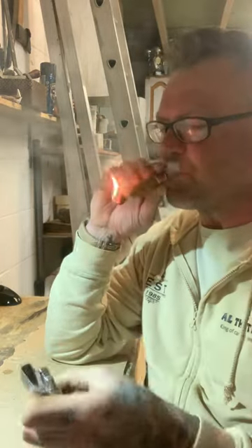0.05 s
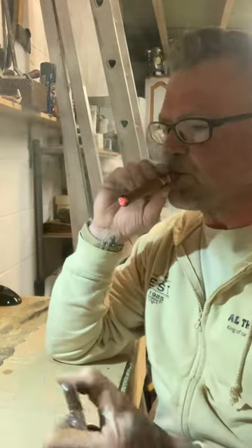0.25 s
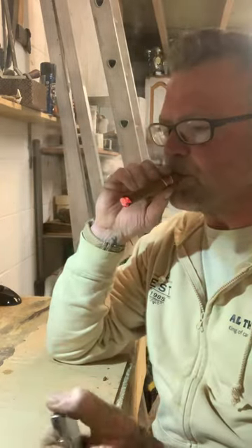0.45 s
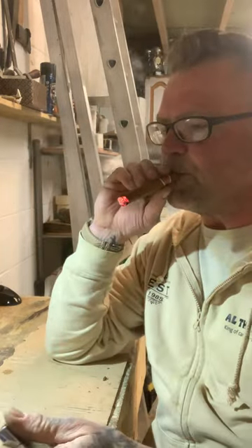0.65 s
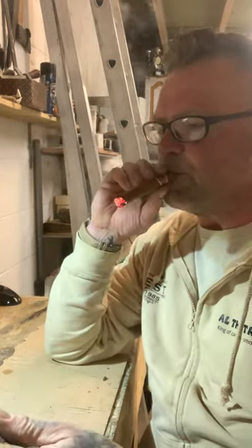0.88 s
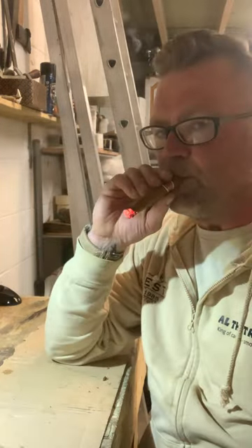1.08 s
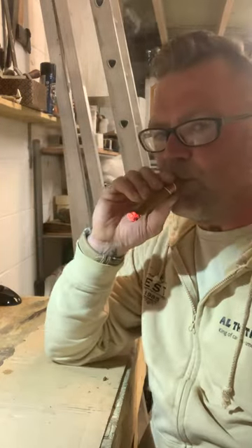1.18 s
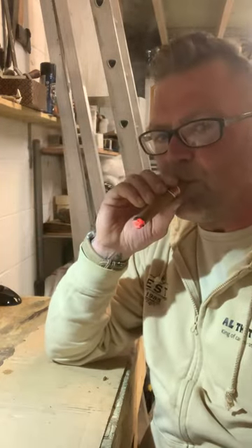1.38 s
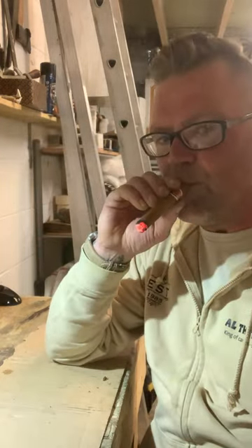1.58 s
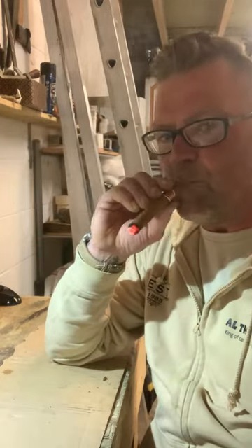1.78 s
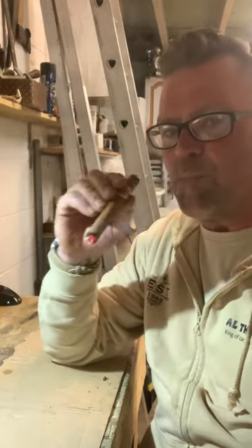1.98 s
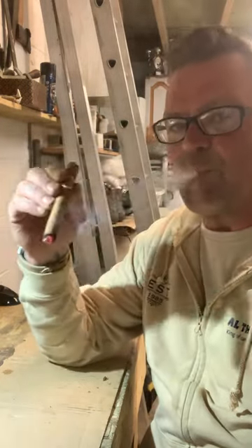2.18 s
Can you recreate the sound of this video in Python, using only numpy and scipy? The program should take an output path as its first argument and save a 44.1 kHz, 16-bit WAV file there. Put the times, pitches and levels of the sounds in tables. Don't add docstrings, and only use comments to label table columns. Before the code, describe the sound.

A metal lighter is flicked shut close to a phone microphone: brief scrape, cam snap, bright lid slam, short room echo; then a hand settles on the bench with small ticks, rubs and soft thumps.

```python
import sys
import numpy as np
from scipy import signal
from scipy.fft import rfft, irfft
from scipy.io import wavfile
from scipy.ndimage import uniform_filter1d

SR = 44100
rng = np.random.default_rng(int(sys.argv[2]) if len(sys.argv) > 2 else 0)


def digitize_waveform(pressure):
    field = np.atleast_2d(pressure).T
    bounded = np.clip(field, -1, 1)
    quanta = np.round(bounded * 32767).astype(np.int16)
    wavfile.write(sys.argv[1], SR, quanta)


def nominal_scale(level):
    x = np.asarray(level, float) / 20
    return 10 ** x


N = 99225
T = np.arange(N) / SR
HZ = np.fft.rfftfreq(N, 1 / SR) + 1


def along(table):
    hz, value = np.array(table).T
    return np.interp(np.log(HZ), np.log(hz), value)


def set_rms(x, db):
    return x * nominal_scale(db) / np.sqrt(np.mean(x ** 2))


def coloured_noise(table):
    return set_rms(irfft(rfft(rng.standard_normal(N)) * nominal_scale(along(table)), N), 0)


def wander(rate_hz):
    hold = int(SR / rate_hz)
    steps = np.repeat(rng.standard_normal(N // 100), hold)[:N]
    return 1.3 * uniform_filter1d(uniform_filter1d(steps, hold), hold)


def swell(middle_s, half_s):
    return np.exp(-((T - middle_s) / half_s) ** 2)


def trio(make):
    return np.array([make() for _ in range(3)])


def short(x):
    return x[:4096]


def place(start_s, shape):
    k = int(start_s * SR) + 1
    return np.pad(shape(short(T) + k / SR - start_s), (k, N))[:N]


def decaying_sine(t, hz, t60):
    return np.exp(-np.log(1000) * t / t60) * np.sin(2 * np.pi * hz * t)


# (frequency [Hz], level [dB per Hz])
AIR_SPECTRUM = [(25, -26.5), (60, -2), (180, -14), (400, -8.5), (600, -15), (2200, -29), (4400, -41.5),
                (6000, -63.5)]
# (frequency [Hz], level [dB per Hz])
HISS_SPECTRUM = [(3000, -14.5), (5000, -17), (6000, -0.5), (8400, 3), (10200, 2.5), (12500, -4.5),
                 (14400, -12), (14700, -49.5)]
# (frequency [Hz], level [dB], width [Hz])
HUM_RESONANCES = [(59, -64.5, 9.5), (134.6, -69, 14), (288.9, -68, 30), (339, -67, 30), (408, -66, 5.8),
                  (460, -65.5, 20), (532.3, -67.5, 26), (744, -70, 10), (881, -76, 17), (1265, -72, 80),
                  (1489, -75, 36), (2062, -80, 40), (2690, -85, 17), (3820, -85.5, 90)]
AIR_DB, HISS_DB = -55.5, -82


def air():
    hum_power = 0
    for hz, db, width in HUM_RESONANCES:
        hum_power = hum_power + nominal_scale(2 * db) / width / (1 + (2 * (HZ - hz) / width) ** 4)
    hum_gain = np.sqrt(hum_power * SR / 2)
    spectrum = rfft(trio(lambda: nominal_scale(AIR_DB) * coloured_noise(AIR_SPECTRUM)))
    spectrum = spectrum + rfft(trio(lambda: rng.standard_normal(N))) * hum_gain
    out = trio(lambda: nominal_scale(HISS_DB) * coloured_noise(HISS_SPECTRUM))
    half_octave = np.log2(HZ / 25) * 2
    for k in range(-1, 19):
        window = np.clip(1 - np.abs(half_octave - k), 0, 1)
        out = out + irfft(spectrum * window, N) * nominal_scale(1.6 * wander(9))
    return out


# (frequency [Hz], t60 [s])
ROOM_T60 = [(1000, 0.36), (2600, 0.41), (6000, 0.24), (10000, 0.21), (16000, .16)]
# (frequency [Hz], level [dB])
ROOM_COLOUR = [(2600, 2), (4300, 2), (5000, -6.5), (5600, 3), (8000, -2.5), (11000, -10), (14000, -2.5),
               (16000, -4.5)]
ROOM_DB = -12.5


def room(x):
    def tail():
        size = SR // 2
        hz, t, bins = signal.stft(rng.standard_normal(size), SR)
        t60 = np.interp(hz, *np.array(ROOM_T60).T)[:, None]
        echoes = signal.istft(bins * nominal_scale(-60 * t / t60), SR)[1][:size]
        echoes = echoes * np.clip(T[:size] / 0.01 - 1, 0, 1)
        wet = rfft(x) * rfft(echoes, N) * nominal_scale(ROOM_DB + along(ROOM_COLOUR))
        return irfft(wet, N) / np.sqrt(np.sum(echoes ** 2))
    return trio(tail)


# (middle [s], half length [s], level [dB])
THUMPS = [
    (0.19, 0.037, -50.5),
    (0.304, 0.043, -59.5),
    (0.836, 0.0525, -54.5),
    (0.997, 0.061, -58),
    (2.096, 0.14, -50.5),
]


def thumps():
    rumble = coloured_noise([(15, -25), (30, -6), (55, 0), (85, -5), (130, -30), (500, -90)])
    return rumble * sum(nominal_scale(db) * swell(middle, half) for middle, half, db in THUMPS)


# (middle [s], half length [s], level [dB], brightness [dB])
RUSTLES = [
    (0.088, 0.047, -62.5, -2),
    (0.203, 0.025, -55, -0.5),
    (0.744, 0.069, -65, -5),
    (0.85, 0.024, -56.5, -12),
    (0.922, 0.034, -58, -7.5),
    (1.027, 0.0418, -61, -15),
    (1.122, 0.035, -82, 3),
    (1.714, 0.0199, -75, 13.5),
    (2.12, 0.037, -65.5, 2),
    (2.16, 0.0582, -72, -2.5),
]
# (frequency [Hz], level [dB])
RUSTLE_SPECTRUM = [(500, -25.5), (1500, 0), (4000, -3), (5100, -13.5), (7000, -10), (8500, -11.5),
                   (10200, -7.5), (14000, -28)]


def rustle():
    out = 0
    for low_hz, high_hz, tilt in ((300, 5300, 0), (5000, 15000, 1)):
        band = signal.butter(2, (low_hz, high_hz), "band", fs=SR, output="sos")
        noise = signal.sosfiltfilt(band, trio(lambda: coloured_noise(RUSTLE_SPECTRUM)))
        grain = noise * nominal_scale(2.2 * wander(110))
        strokes = sum(nominal_scale(db + tilt * bright_db) * swell(middle, half) for middle, half, db, bright_db in RUSTLES)
        out = out + grain * strokes
    return out


# (time [s], level [dB], ring [Hz], ring t60 [s])
TICKS = [(0.045, -66, 6940, 0.074), (0.186, -40, 6413, 0.005), (0.186, -46, 4270, 0.0053),
         (0.186, -53, 10230, 0.0041), (0.187, -40, 14400, 0.0052), (0.187, -37.5, 2061, 0.016),
         (.422, -59.5, 14800, 0.0096), (.827, -51.5, 3930, 0.008), (0.8289, -41.5, 4000, 0.008),
         (.826, -46.5, 6920, 0.0069), (.831, -52, 10330, 0.0091), (0.8305, -43, 1904, 0.006),
         (0.829, -52, 13800, 0.006), (0.8409, -41.5, 4019, 0.012), (0.9084, -49.5, 10610, 0.0054),
         (0.9087, -52, 6820, .005), (1.026, -57, 7800, 0.021), (1.2275, -62, 11660, 0.016),
         (1.228, -57, 14820, 0.013), (2.0555, -55, 15370, 0.0097), (2.06, -54, 1480, 0.019)]
RUB_S, RUB_DB = 0.00075, -13.5
KNOCK_DB, KNOCK_TURNS = -11, 2.3


def ticks():
    def tick(t, hz, t60):
        rub = rng.standard_normal(len(t)) * t / RUB_S * np.exp(-t / RUB_S)
        body = nominal_scale(RUB_DB) * decaying_sine(t, hz, t60)
        knock = nominal_scale(KNOCK_DB) * np.exp(-t * hz / KNOCK_TURNS) * np.sin(2 * np.pi * hz * t)
        out = short(signal.fftconvolve(rub, body + knock))
        return out / np.abs(out).max()
    return sum(nominal_scale(db) * place(s, lambda t: tick(t, hz, t60)) for s, db, hz, t60 in TICKS)


RATTLE_RAD, RATTLE_S = 1.3, .01


def ring(start_s, modes):
    def shape(t):
        kicks = rng.standard_normal((len(modes), len(t)))
        jolt = signal.lfilter([1], [1, -1], kicks) * RATTLE_RAD / np.sqrt(RATTLE_S * SR)
        out = 0
        for (hz, db, t60), phase in zip(modes, jolt):
            decay = np.exp(-np.log(1000) * t / t60)
            out = out + nominal_scale(db) * decay * np.sin(2 * np.pi * hz * t + phase)
        return out
    return place(start_s, shape)


def crack(start_s, db, fall_s):
    return place(start_s, lambda t: nominal_scale(db) * rng.standard_normal(len(t)) * np.exp(-t / fall_s))


def blows(start_s, table, modes, ring_db, crack_db):
    out = 0
    for delay, blow_db, burst_db in table:
        db_per_khz = -1.6 if delay > 0 else 0
        struck = [(hz, db + db_per_khz * hz / 1000, t60) for hz, db, t60 in modes]
        out = out + nominal_scale(ring_db + blow_db) * ring(start_s + delay, struck)
        out = out + crack(start_s + delay, crack_db + burst_db, 0.0013)
    return out


# (frequency [Hz], level [dB], t60 [s])
CAM_MODES = [(1718, -6.5, 0.093), (1480, -16, 0.033), (2600, 4, 0.063), (2842, -9.5, 0.08),
             (2880, -14.5, 0.13), (3707, -4.5, 0.078), (3770, -6, 0.05), (4420, -7.5, 0.03),
             (2681, -21, 0.12), (5794, 1, 0.034), (6596, -13.5, .02), (7700, -9.5, 0.023),
             (10160, -6.5, 0.012), (9440, -15.5, 0.0078)]
# (time after the snap [s], ring [dB], crack [dB])
CAM_BLOWS = [
    (0, -1.5, 0.5),
    (.0025, -9.5, -12),
    (.005, -1.5, -13.5),
    (.0115, -8, -28),
    (.024, -21.5, -33.5),
    (.031, -17.5, -32),
    (.038, -11.5, -28.5),
]
# (frequency [Hz], level [dB], t60 [s])
LID_MODES = [(1335, -11, 0.045), (2494, -14.5, 0.059), (2613, -12, 0.1), (3645, -27.5, .06),
             (5378, -7.5, 0.09), (5780, -11, 0.026), (6560, -9.5, 0.032), (7418, -8, 0.02),
             (9200, -8, 0.0064), (10547, 0, .011), (11170, -11, 0.0031), (13300, -10.5, 0.018),
             (14400, -0.5, .016), (15700, -13, .015)]
# (time after the slam [s], ring [dB], crack [dB])
LID_BLOWS = [
    (0, -3.5, 3.5),
    (0.0102, -14, -21.5),
    (0.025, -22, -23.5),
]
CAM_S, CAM_DB, CAM_CRACK_DB = .2128, -22.5, -21.5
SLAM_S, SLAM_DB, SLAM_CRACK_DB = .2577, -16.5, -22
SCRAPE_S, SCRAPE_DB, SCRAPE_RISE_DB, SCRAPE_DULL_HZ = 0.014, -44.5, 14, 3000


def lighter():
    left = (CAM_S - T) / SCRAPE_S
    grit = rng.standard_normal(N) * (left > 0) * (left < 1)
    grit = grit * nominal_scale(-SCRAPE_RISE_DB * np.clip(left, 0, 1))
    dull_modes = [(hz, db - 6 * (hz / SCRAPE_DULL_HZ) ** 2, t60) for hz, db, t60 in CAM_MODES]
    scrape = nominal_scale(SCRAPE_DB) * signal.fftconvolve(grit, short(ring(0, dull_modes)))[:N]
    snap = blows(CAM_S, CAM_BLOWS, CAM_MODES, CAM_DB, CAM_CRACK_DB)
    slam = blows(SLAM_S, LID_BLOWS, LID_MODES, SLAM_DB, SLAM_CRACK_DB)
    return scrape + snap + slam


def causal(table):
    cepstrum = irfft(np.log(nominal_scale(along(table)[::N // 1024][:513])))
    fold = np.r_[1, np.full(511, 2), 1, np.zeros(511)]
    return irfft(np.exp(rfft(cepstrum * fold)))


# (frequency [Hz], level [dB])
NEAR_COLOUR = [(700, -46), (1300, -9), (4000, 1), (7500, 2.5), (8400, 2), (10000, 7.5), (12500, -6),
               (16000, -12.5)]


def colour_near(x):
    return signal.fftconvolve(x, causal(NEAR_COLOUR)[None], axes=1)[:, :N]


# (frequency [Hz], left minus right [dB])
PORT_DB = [(50, 0.17), (110, 1.3), (200, 4.5), (380, 0.77), (700, 0.06)]


def ports(x, lead, share=1):
    spectrum = rfft(x)
    side = np.array([[.5], [-.5]])
    if spectrum.ndim > 1:
        spectrum = np.sqrt(share) * spectrum[0] + np.sqrt(1 - share) * spectrum[1:]
    return irfft(spectrum * nominal_scale(side * along(PORT_DB)) * np.exp(1j * side * along(lead)), N)


# (frequency [Hz], left lead [rad])
NEAR_LEAD = [(130, 0), (1300, -.7), (3800, -2.0), (4700, -3.0), (7000, -1.6), (8800, -2.75), (10800, -3.6),
             (13500, -5.9)]
# (frequency [Hz], left lead [rad])
FAR_LEAD = [(130, 0), (800, -1.9), (2500, -1.6), (5000, -3.0), (7000, -1.9), (8300, -3.1), (11300, -3.2),
            (13500, -6.1)]
# (frequency [Hz], share [0-1])
NEAR_SHARE = [(1000, 1), (2600, 0.28), (4000, 0.66), (7000, 1), (9000, 0.92)]
# (frequency [Hz], share [0-1])
FAR_SHARE = [(90, 0.975), (200, .8), (600, 0.69), (1500, 0.43), (3000, 0.87), (6000, 0.35), (8300, 0.97),
             (12000, 0.93)]


def scene():
    near = colour_near(trio(lighter) + ticks())
    far = room(near[0]) + rustle() + air()
    near_share = np.clip(along(NEAR_SHARE), 0, 1)
    far_share = np.clip(along(FAR_SHARE), 0, 1)
    return ports(near, NEAR_LEAD, near_share) + ports(thumps(), NEAR_LEAD) + ports(far, FAR_LEAD, far_share)


def roll_off(x):
    return signal.sosfilt(signal.butter(12, 16980, fs=SR, output="sos"), x)


def record(dry):
    low_pass = signal.ellip(10, .2, 70, 16450, fs=SR, output="sos")
    mix = signal.sosfilt(low_pass, dry)
    return roll_off(mix)


dry = scene()
out = record(dry)
digitize_waveform(out)
```